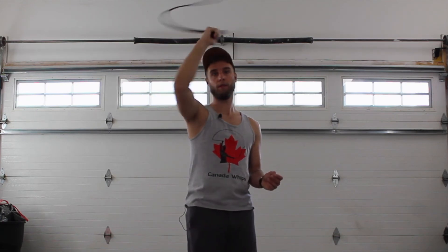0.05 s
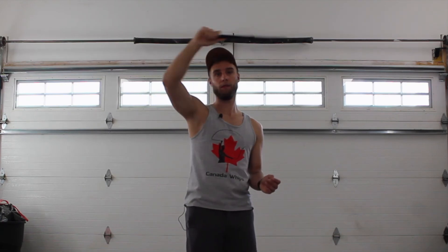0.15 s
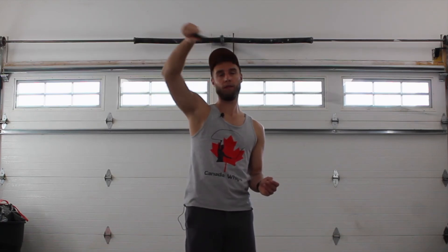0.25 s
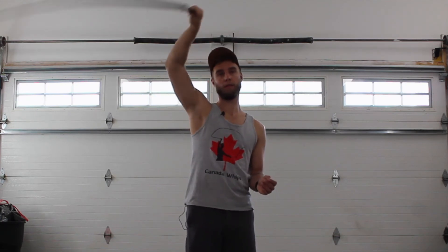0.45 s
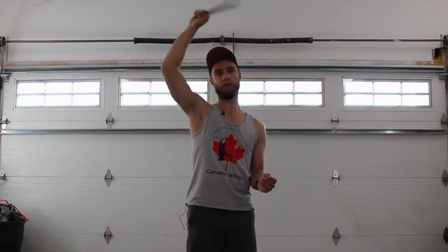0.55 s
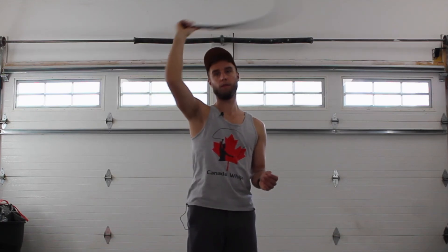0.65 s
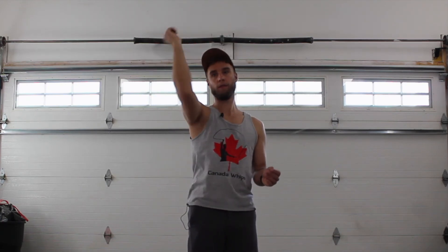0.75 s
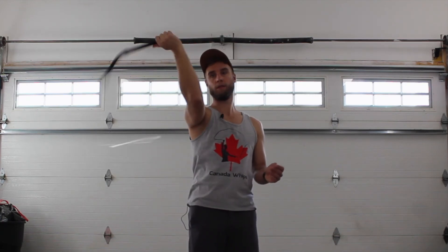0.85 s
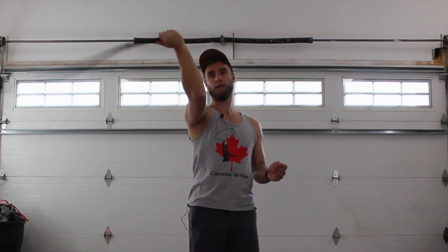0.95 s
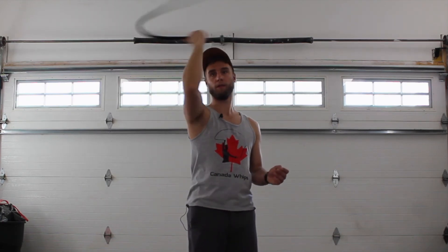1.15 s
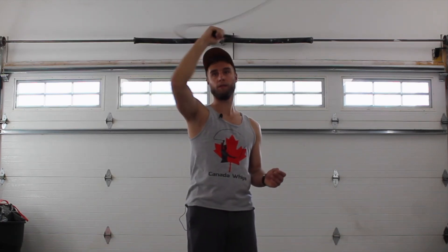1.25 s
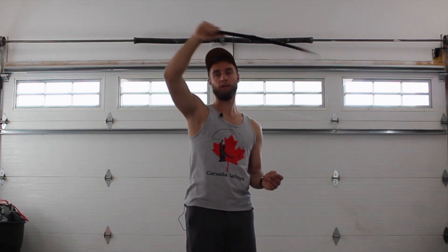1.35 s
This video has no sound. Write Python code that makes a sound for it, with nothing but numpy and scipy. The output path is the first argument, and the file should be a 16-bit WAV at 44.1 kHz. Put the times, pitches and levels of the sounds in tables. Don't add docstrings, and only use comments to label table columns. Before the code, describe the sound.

A long whip cracking three times indoors, piercing snaps followed by swelling, quickly fading room reverberation

```python
import sys
import numpy as np
from scipy import signal
from scipy.fft import rfft, irfft
from scipy.io import wavfile
from scipy.ndimage import uniform_filter1d

SR = 44100
rng = np.random.default_rng(int(sys.argv[2]) if len(sys.argv) > 2 else 0)


def voltage_ratio(level):
    return 10 ** (np.asarray(level, float) / 20)


def generate_wav(sig):
    pcm = np.round(np.clip(np.atleast_2d(sig).T, -1, 1) * 32767).astype(np.int16)
    wavfile.write(sys.argv[1], SR, pcm)


N = 61739


def evened(x):
    return x / np.sqrt(np.mean(x ** 2) + 1e-20)


def read(points, hz):
    f, value = np.transpose(points)
    return np.interp(np.log(hz + 1), np.log(f + 1), value)


def add(mix, s, sound):
    part = mix[round(s * SR):][:len(sound)]
    part += sound[:len(part)]


def shock(peak_db, pitch_hz):
    u = np.arange(160) / SR * 2 * np.pi * pitch_hz * 0.6
    push = (1 - np.exp(-u / 1.2)) * np.sin(u) * np.exp(-u / 2.2)
    pulse = np.diff(push * np.hanning(320)[160:])
    roughness = 0.22 * rng.standard_normal(60) * np.exp(-np.arange(60) / 25)
    wall = np.append(-1, roughness)
    return voltage_ratio(peak_db + 3) * np.convolve(pulse / abs(pulse).max(), wall)


ARRIVAL_S = [.2019, .21, .2144, .2177, .222, .2347, .2435, .254, .792, .795, .799, .8082, .8102, .8133,
             .8212, .8249, 1.3775, 1.3862, 1.3905, 1.3939, 1.398]
# peak in dB, pitch in Hz.
ARRIVALS = [(-48, 1800), (-43, 3000), (-26, 3000), (-21, 5000), (-24, 2500), (-13, 5000), (-10, 11000),
            (-11, 3000), (-44, 2500), (-29, 2500), (-34, 2500), (-19, 8000), (-16, 6000), (-12, 5000),
            (-15, 12000), (-13, 1800), (-42, 1500), (-37, 3000), (-25, 5000), (-22, 5000), (-22, 4000)]


def cracks():
    mix = np.zeros(N)
    for s, row in zip(ARRIVAL_S, ARRIVALS):
        add(mix, s, shock(*row))
    return mix


def echo_grains(start):
    grain_db, grains_per_s = 2.0, 6000
    smooth, blend_s = 0.5, 0.15
    draw = rng.random((N, 3))
    sizes = voltage_ratio(-grain_db * np.log(draw[:, 1] + 1e-3))
    present = draw[:, 2] < grains_per_s / SR
    grains = np.sign(draw[:, 0] - 0.5) * sizes * present
    blend = smooth + np.maximum(np.arange(N) / SR - start, 0) / blend_s
    return (evened(grains) + blend * rng.standard_normal(N)) / np.sqrt(1 + blend ** 2)


# pitch in Hz, level in dB per Hz.
ROAR = [(24, -57.5), (40, -31.5), (580, -1), (981, -3.5), (1290, -0.5), (3600, -1), (10800, -10.5),
        (13500, -12.5), (15700, -28)]


def roar_colour(hz, tilt_db, hump_db):
    tilt = tilt_db * np.log2((hz + 200) / 2000)
    hump = hump_db * np.exp(-np.log2((hz + 1) / 1700) ** 2)
    colour_db = read(ROAR, hz) + tilt + hump
    return colour_db - 10 * np.log10(np.mean(voltage_ratio(2 * colour_db)))


# pitch in Hz, threshold in dB.
GATE = [(100, -45.5), (300, -23.5), (700, -25.5), (1200, -26.5), (2000, -37), (4000, -48.5), (7000, -63),
        (14000, -55.5)]
# pitch in Hz, knee width in dB.
GATE_KNEE = [(300, 1), (900, 3), (2000, 3), (8000, 10)]


def gate(level_db, hz, lift_db):
    slope, depth_db = 3.0, 20
    under_db = lift_db + read(GATE, hz)[:, None] - level_db
    knee = np.maximum(read(GATE_KNEE, hz), 0.5)[:, None]
    soft_under_db = knee * np.logaddexp(0, under_db / knee)
    return -depth_db * np.tanh(slope * soft_under_db / depth_db)


# pitch in Hz, seconds to die by 60 dB.
GARAGE = [(80, 0.4), (300, 0.89), (1000, 1.264), (2500, 0.93), (5000, 0.85), (8000, 0.56), (14000, 0.33)]
# pitch in Hz, holding in dB.
SLOW_BASS = [(100, 24.5), (500, 0.5), (1500, 1), (8000, 2)]


def roar(start, tilt_db, lift_db, hump_db, release):
    late_s = 0.022
    echoes = np.pad(echo_grains(start), (0, 512), "reflect")
    hz, frame_s, z = signal.stft(echoes, SR, nperseg=256, noverlap=224)
    age = np.maximum(frame_s - start, 0)[None]
    colour_db = roar_colour(hz, tilt_db, hump_db)[:, None]
    fade_db = -60 * age / read(GARAGE, hz)[:, None]
    gate_db = gate(colour_db - colour_db.max() + fade_db, hz, lift_db)
    held_db = -read(SLOW_BASS, hz)[:, None] * np.exp(-age / late_s)
    z = z * voltage_ratio(colour_db + fade_db + gate_db + held_db)
    tail = signal.istft(z, SR, nperseg=256, noverlap=224)[1][:N]
    t = np.arange(N) / SR
    return tail * voltage_ratio(np.interp(t, *np.transpose(release))) * (t > start)


# start in seconds, brightness in dB per octave,
# gate threshold lift in dB, mid hump in dB.
CRACKS = [
    (0.2088, 2, -5.5, -1.5),
    (.796, -2, 4.5, 0),
    (1.386, -0.5, -4, -11.5),
]
# time in seconds, roar level in dB before it dies.
RELEASE = [
    [(.2095, -47), (.213, -50), (.217, -27), (.227, -27), (.232, -18.5), (.244, -15.5), (.275, -11.5),
     (.292, -9), (.32, -9.5)],
    [(.796, -43), (.8, -29.5), (.808, -32), (.817, -22), (.822, -17), (.835, -18), (.86, -17)],
    [(1.3858, -49), (1.39, -49), (1.393, -21.5), (1.3945, -31), (1.4, -32)],
]


def roars():
    return sum(roar(*row, release) for row, release in zip(CRACKS, RELEASE))


def resonate(x, hz, width_hz):
    turn = np.exp(2j * np.pi * np.cumsum(hz) / SR)
    r = np.exp(-np.pi * width_hz / SR)
    ringing = signal.lfilter([(1 - r) ** 2], np.convolve([1, -r], [1, -r]), x / turn)
    return 2 * (turn * ringing).real


# time in seconds, whistle pitch in Hz,
# whistle level in dB, hiss level in dB.
SWING = [(0, 800, -49, -81), (.06, 760, -51, -83), (.09, 740, -57, -85), (.112, 760, -51, -84),
         (.17, 730, -57, -84), (.18, 590, -54, -76), (.195, 570, -57, -74), (.205, 560, -58, -60),
         (.26, 550, -70, -80), (.72, 650, -80, -84), (.765, 500, -64, -73), (.778, 550, -60, -68),
         (.8, 650, -58, -60), (.86, 700, -70, -80), (1.33, 500, -85, -88), (1.36, 500, -65, -82),
         (1.377, 500, -67, -72), (1.4, 500, -66, -62)]


def swing():
    width_hz, overtone_ratio, overtone_db, lump_db = 150, 1.9, -12, 2.5
    s, pitch_hz, whistle_db, hiss_db = np.transpose(SWING)
    t = np.arange(N) / SR
    hz = np.interp(t, s, pitch_hz)
    low = evened(resonate(rng.standard_normal(N), hz, width_hz))
    high = evened(resonate(rng.standard_normal(N), overtone_ratio * hz, width_hz))
    whistle = voltage_ratio(np.interp(t, s, whistle_db)) * (low + voltage_ratio(overtone_db) * high)
    low_cut = signal.butter(1, 1500, "high", fs=SR, output="sos")
    hiss = signal.sosfilt(low_cut, uniform_filter1d(rng.standard_normal(N), size=3))
    lumps = evened(uniform_filter1d(rng.standard_normal(N), size=150))
    return whistle + voltage_ratio(np.interp(t, s, hiss_db) + lump_db * lumps) * evened(hiss)


def tick(peak_db, pitch_hz, length_s):
    t = np.arange(-200, 200) / SR
    return voltage_ratio(peak_db) * np.exp(-(2 * t / length_s) ** 2) * np.cos(2 * np.pi * pitch_hz * t)


# time of the middle in seconds, peak in dB, pitch in Hz, length in seconds.
TICKS = [(0.13, -59.5, 3180, 0.0043), (.124, -66, 5500, 0.00045), (.182, -56.5, 5500, 0.00089),
         (.124, -61, 7400, 0.0021), (.172, -70, 6400, 0.0013), (1.2, -70, 8000, 0.00046),
         (.242, -19, 760, 0.0027), (.777, -40.5, 710, 0.0041), (.585, -64, 11000, .001),
         (.739, -39.5, 6100, 0.00057), (0.738, -51, 7900, 0.0005), (0.74, -62, 11000, 0.0006),
         (.778, -62, 13500, 0.0017), (1.16, -67.5, 11500, 0.0013)]


def ticks():
    mix = np.zeros(N)
    for s, peak_db, pitch_hz, length_s in TICKS:
        add(mix, s - 200 / SR, tick(peak_db, pitch_hz, length_s))
    return mix


# pitch in Hz, level in dB.
AIR = [(30, -8.5), (100, -4), (300, 7), (600, -8.5), (1200, 1.5), (2500, -9.5), (6000, -36.5), (15000, -39)]


def air():
    floor_db, hum_db, thump_db = -67, -70, -75
    hum_from_s, hum_to_s, thump_s = 0.93, 1.38, 0.735
    t = np.arange(N) / SR
    spectrum = rfft(rng.standard_normal(N)) * voltage_ratio(read(AIR, np.fft.rfftfreq(N, 1 / SR)))
    floor = evened(irfft(spectrum, N))
    hum_on = np.clip(np.minimum(t - hum_from_s, hum_to_s - t) / 0.04, 0, 1)
    thump = np.exp(-((t - thump_s) / 0.03) ** 2)
    low_level = voltage_ratio(hum_db) * hum_on + voltage_ratio(thump_db) * thump
    return voltage_ratio(floor_db) * floor + low_level * np.sin(2 * np.pi * 150 * t)


def scene():
    mix = swing() + air() + roars() + cracks() + ticks()
    return mix[None]


def band_limit(x):
    return signal.sosfilt(signal.butter(12, 15870, fs=SR, output="sos"), x)


def record(dry):
    ceiling = 0.75
    low_cut = signal.butter(1, 45, "high", fs=SR, output="sos")
    cut = signal.sosfilt(low_cut, dry)
    limited = ceiling * np.tanh(cut / ceiling)
    treble_edge = signal.firwin(511, 15700, window=("kaiser", 11), fs=SR)
    mix = signal.oaconvolve(limited, treble_edge[None], "same")
    return band_limit(mix)


dry = scene()
out = record(dry)
generate_wav(out)
```